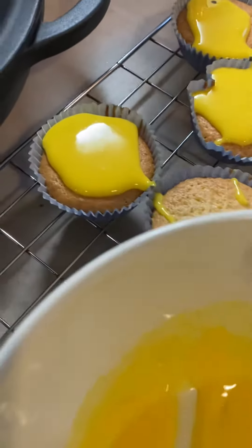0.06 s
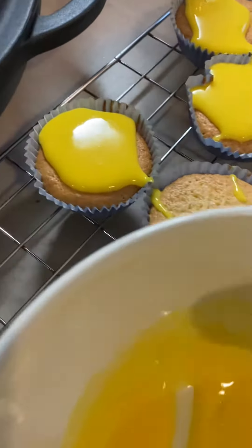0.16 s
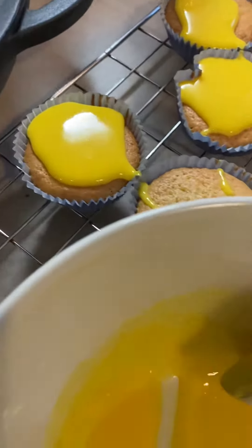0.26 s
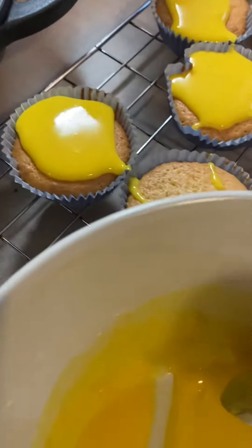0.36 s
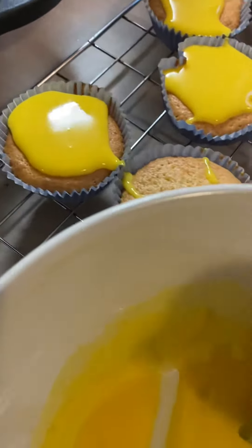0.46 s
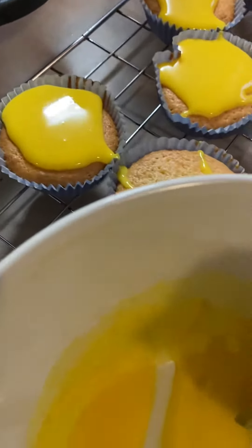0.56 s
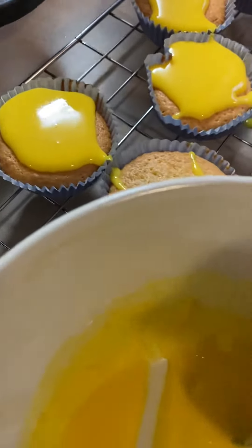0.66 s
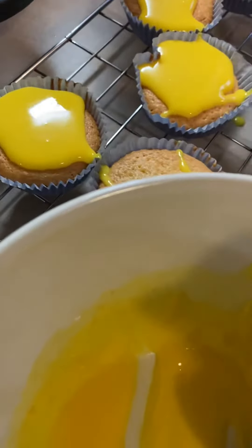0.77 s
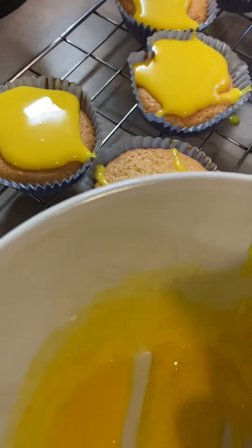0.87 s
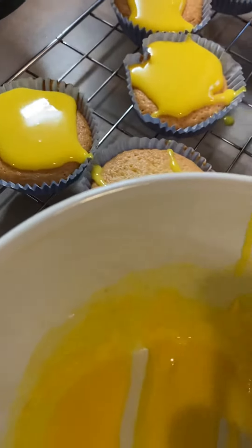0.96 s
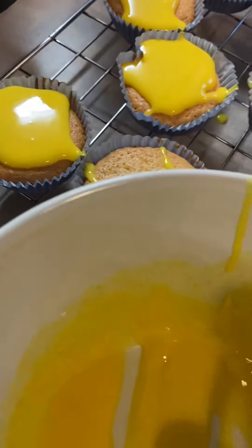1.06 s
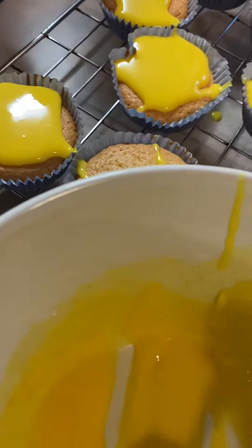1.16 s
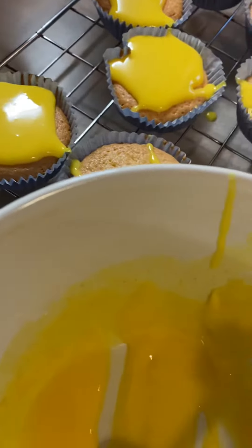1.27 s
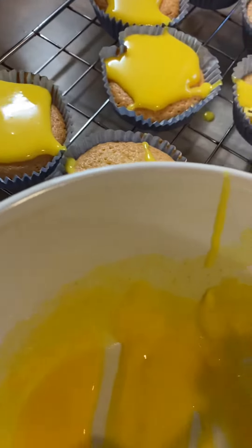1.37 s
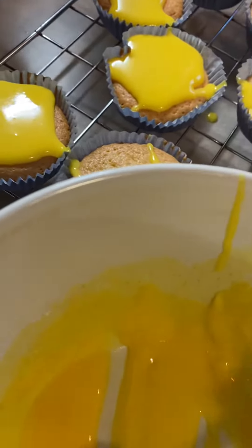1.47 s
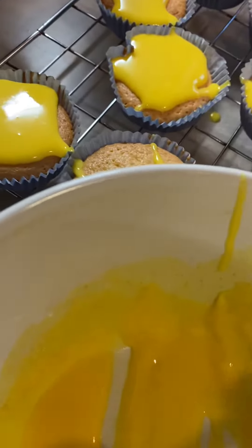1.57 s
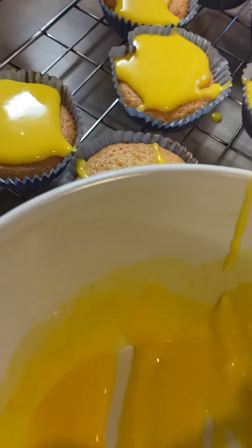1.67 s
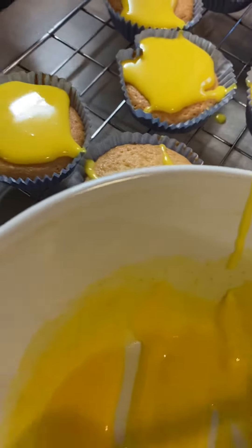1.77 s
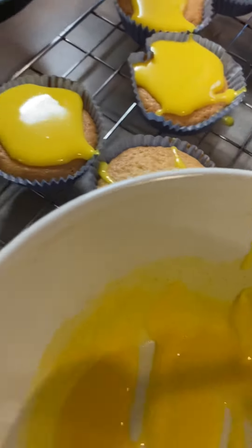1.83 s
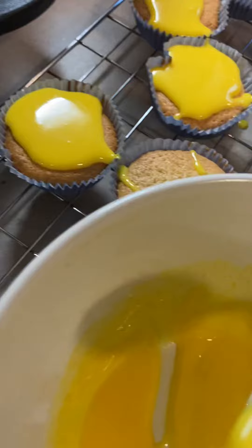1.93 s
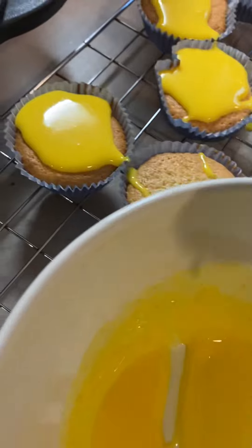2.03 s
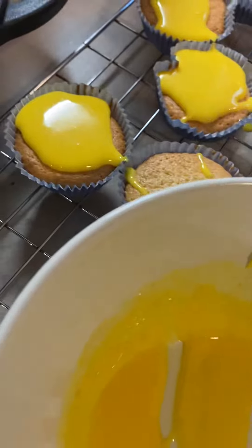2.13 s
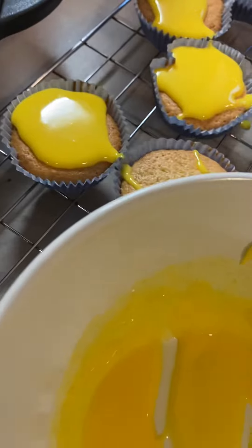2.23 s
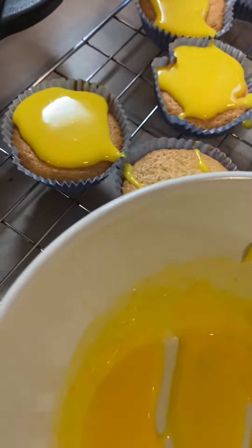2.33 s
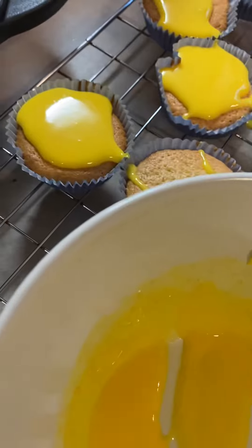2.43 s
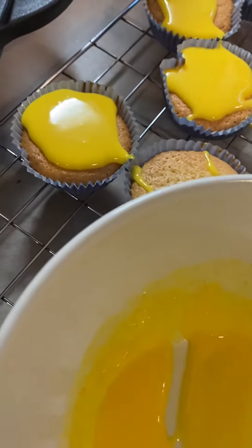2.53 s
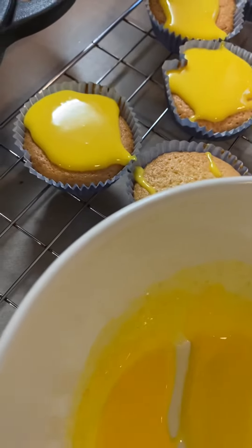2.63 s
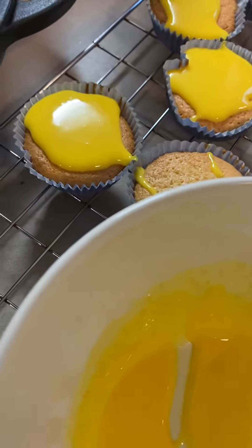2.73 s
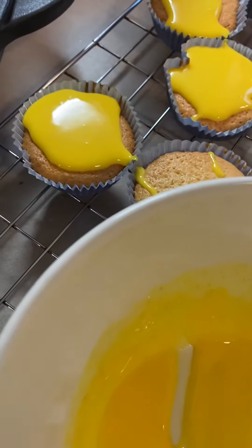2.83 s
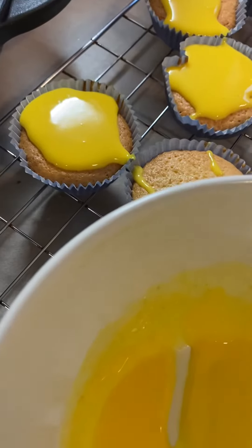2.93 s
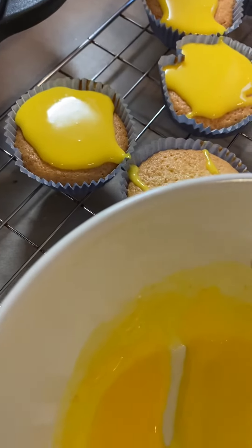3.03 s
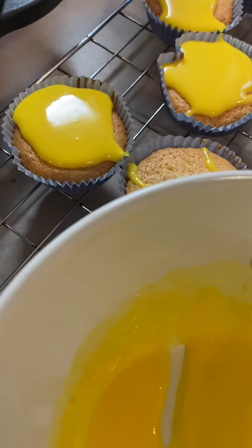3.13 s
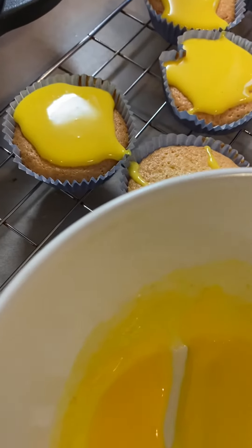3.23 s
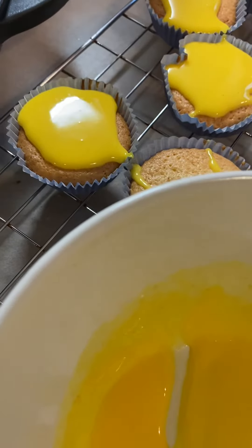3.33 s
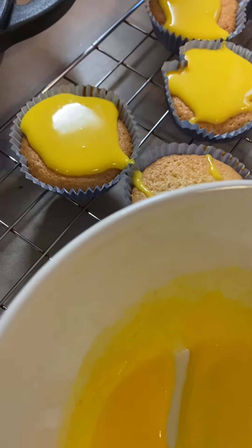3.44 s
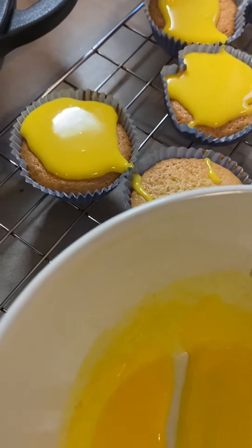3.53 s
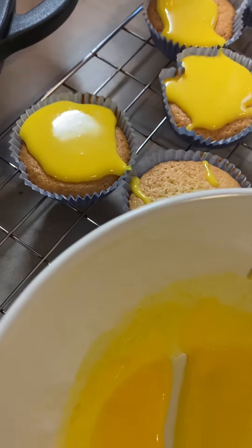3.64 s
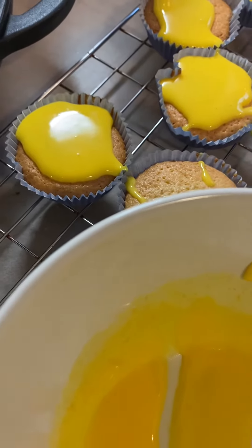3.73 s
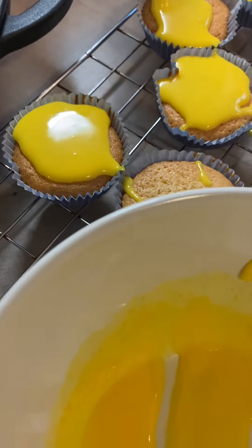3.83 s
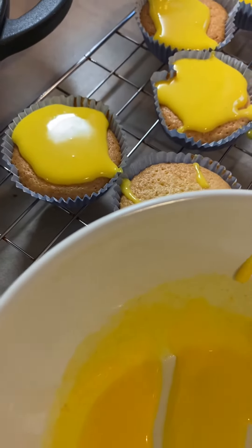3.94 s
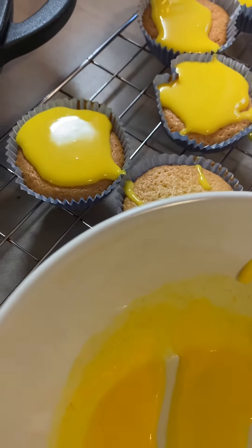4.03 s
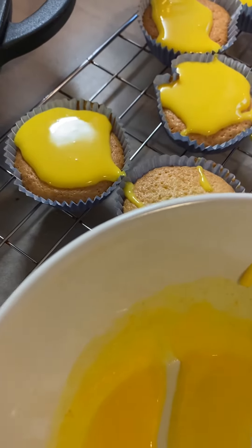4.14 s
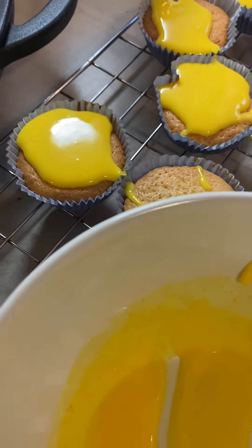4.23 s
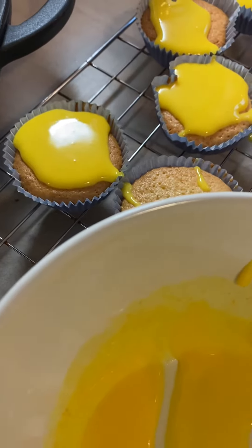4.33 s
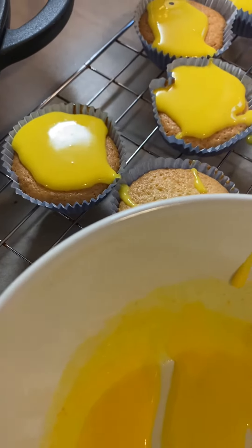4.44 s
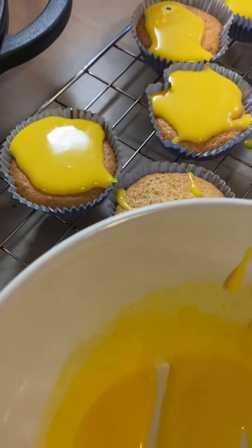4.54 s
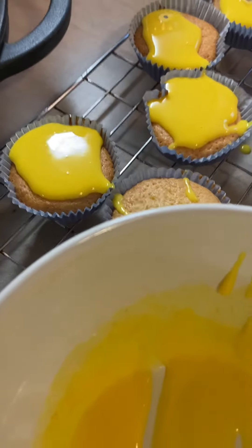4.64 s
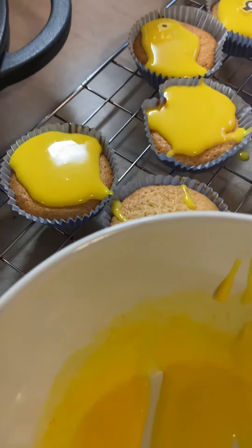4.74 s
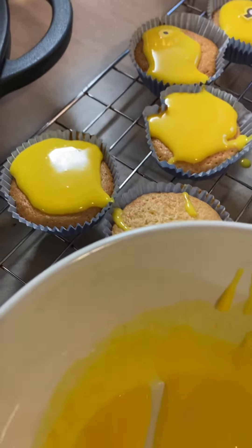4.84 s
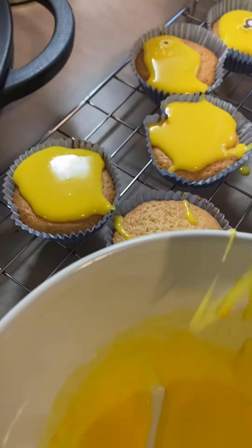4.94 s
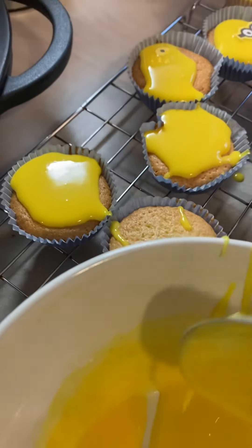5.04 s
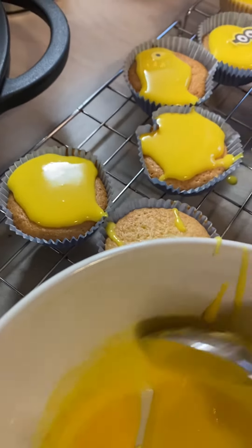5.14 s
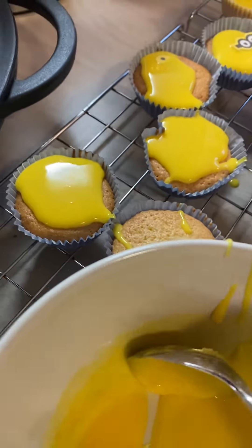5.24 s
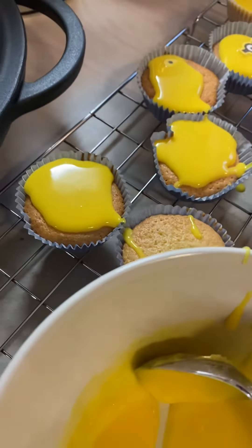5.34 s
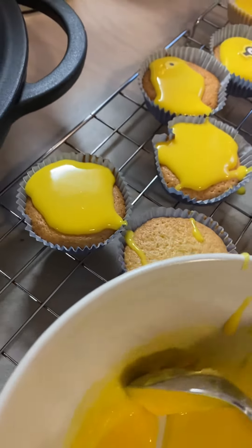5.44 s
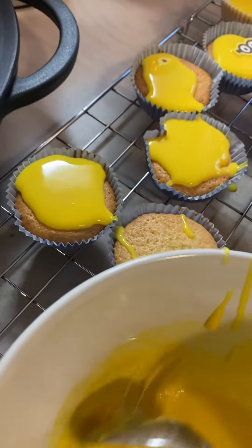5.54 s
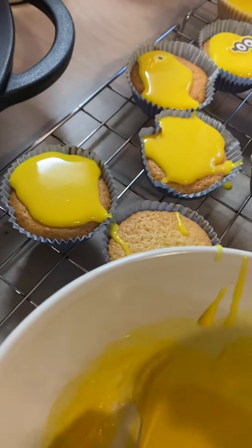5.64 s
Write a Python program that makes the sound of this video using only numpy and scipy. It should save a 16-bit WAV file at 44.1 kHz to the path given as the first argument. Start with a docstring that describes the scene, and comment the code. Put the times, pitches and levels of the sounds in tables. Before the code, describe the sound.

Close stereo pickup of a spoon working in thin icing: gritty, resonant strokes on glazed ceramic, one low thump of the bowl on the worktop, a cluster of bright, quickly choked clinks, and short scrapes. Then mostly quiet, with barely audible spreading rubs and sticky ticks over a wavering low hum. Near the end come two light metallic rings, wet ticks and fresh scraping, in a small, lightly reverberant kitchen.

```python
"""Spoon in a bowl of icing

A metal spoon scrapes through runny icing in a ceramic bowl, knocks and clinks on its wall, and is lifted out.
Soft rubs and, in a pause, faint wet ticks follow; then it comes back, rings lightly and scrapes again.
Scrapes are noisy slips filtered by contact resonances; clinks are sums of dying modes and cracks of noise.
A kitchen appliance hums as wavering sines over coloured noise; a close microphone has two ports."""
import sys
import numpy as np
from scipy import signal
from scipy.fft import rfft, irfft
from scipy.io import wavfile
from scipy.ndimage import uniform_filter1d

SR = 44100
rng = np.random.default_rng(int(sys.argv[2]) if len(sys.argv) > 2 else 0)


def log_audio(samples):
    """Write samples as a 16-bit WAV file to the path given in sys.argv[1]."""
    # one column per channel
    frames = np.atleast_2d(samples).T
    # limit to full scale, then quantise
    limited = np.clip(frames, -1, 1)
    pcm = np.round(limited * 32767).astype(np.int16)
    wavfile.write(sys.argv[1], SR, pcm)


N = 251224
TIME = np.arange(N) / SR  # of each sample [s]
BINS = np.fft.rfftfreq(N, 1 / SR)  # frequency of each bin [Hz]
BLOW_TIME = np.arange(SR // 3) / SR  # time since a short sound began [s]
BLOW_SPAN = 882  # samples (20 ms) over which a short sound's level is judged


def gain_of(db):
    """Logarithmic level: converts decibels to an amplitude ratio."""
    return 10 ** (np.asarray(db) / 20)


def evened(x, span=None):
    """Normalisation: scales to rms 1, judged over the first span samples."""
    return x / np.sqrt(np.mean(x[:span] ** 2) + 1e-20)


def read(points, hz):
    """Interpolation: reads a spectrum on a log-frequency axis."""
    f, value = np.transpose(points)
    return np.interp(np.log(hz + 1), np.log(f + 1), value)


def add(mix, s, sound):
    """Superposition: mixes a sound in at time s."""
    part = mix[max(round(s * SR), 0):][:len(sound)]
    part += sound[:len(part)]


def coloured(x, points):
    """Linear filtering: weights the spectrum of x by a curve in dB."""
    gain = gain_of(read(points, np.fft.rfftfreq(x.shape[-1], 1 / SR)))
    return irfft(rfft(x) * gain, x.shape[-1])


def bands(x, edges):
    """Band-pass filtering: splits a sound between the given edges [Hz]."""
    filters = [signal.butter(3, pair, "band", fs=SR, output="sos") for pair in zip(edges, edges[1:])]
    return [signal.sosfilt(sos, x) for sos in filters]


def ring(modes, t):
    """Modal superposition: a struck body sounds as exponentially dying sines."""
    return sum(gain_of(db) * 1000 ** (-t / t60) * np.sin(2 * np.pi * hz * t) for hz, db, t60 in modes)


def drift(span):
    """Random modulation: twice-smoothed noise of rms 1 that changes over span seconds."""
    size = max(int(span * SR), 2)
    return evened(uniform_filter1d(uniform_filter1d(rng.standard_normal(N), size), size))


# Steady tones of the appliance, the mains hum first: (frequency [Hz], rms level [dB])
HUM_TONES = [(100.0, -53), (123.7, -56), (247.6, -77), (317.6, -72.5)]
# Spectrum of the murmuring kitchen air: (frequency [Hz], relative level [dB per Hz])
AIR_SPECTRUM = [(20, -21), (32, -11), (48, 0.5), (66, 3), (100, 4), (150, 0), (200, -6.5), (330, -5.5),
                (450, -16), (700, -25.5), (1500, -38.5), (4000, -43), (10000, -50), (16000, -61)]
# The mains hum rises once, from this far below its table level to as far above
HUM_RISE_S, HUM_RISE_TAKES_S, HUM_RISE_DB = 2.153, .3, 1.6


def hum(waver_db=1.21, air_db=-59):
    """Superposed tones: mains hum beats against a motor's tone, over the dull murmur of the kitchen air."""
    mains_gain = gain_of(HUM_RISE_DB * np.tanh((TIME - HUM_RISE_S) / HUM_RISE_TAKES_S))
    tones = np.zeros(N)
    for k, (hz, db) in enumerate(HUM_TONES):
        level = gain_of(db + waver_db * drift(0.18))
        tone = level * np.sin(2 * np.pi * hz * TIME + 0.059 * drift(0.28))
        tones += tone * (mains_gain if k == 0 else 1)
    shared = evened(coloured(rng.standard_normal(N), AIR_SPECTRUM))
    # the part that differs between the ports is weakest in the bass
    air_hz, air_level = np.transpose(AIR_SPECTRUM)
    apart_level = air_level + read([(100, -28.5), (400, -6.5), (1500, 2.0)], air_hz)
    apart = evened(coloured(rng.standard_normal((2, N)), np.transpose([air_hz, apart_level])))
    return np.sqrt(2) * tones + gain_of(air_db) * (shared + gain_of(-8.5) * apart)


def slips():
    """Stick-slip: steel slips on glaze, bunched by the hand's judder; colour shifts from spot to spot."""
    sizes = rng.standard_normal(N) * gain_of(2 * np.minimum(rng.exponential(1, N), 4))
    grains = evened(sizes * (rng.random(N) < 4000 / SR))  # about 4000 slips per second
    judder = gain_of(1.2 * drift(.007))
    z = signal.stft((grains + .6 * rng.standard_normal(N)) * judder, nperseg=512)[2]
    patches = uniform_filter1d(rng.standard_normal(z.shape), size=4, axis=0)
    patches = evened(uniform_filter1d(patches, size=8, axis=1))
    return signal.istft(z * gain_of(2.4 * patches), nperseg=512)[1][:N]


RELEASE_S = .015  # a stroke fades for this long, centred on its end


def stroke(start, end, rise, sag):
    """Envelope of a contact force: the spoon bears down, eases off steadily and lets go."""
    attack = np.clip((TIME - start) / max(rise, .002), 0, 1) ** 2
    release = np.clip((end - TIME) / RELEASE_S + .5, 0, 1)
    easing = gain_of(-sag * np.clip(TIME - start - rise, 0, end - start))
    return attack * easing * release


# Strokes of the spoon: (start [s], end [s], rise, at least 2 ms [s], level of the rasp [dB], sag [dB/s],
# hollow body over the rasp [dB], fizz over the rasp [dB], place of contact)
STROKES = [(0, 0.23, 0.0033, -80.5, 5, -1, 9, "wall"), (0.139, 0.327, 0.18, -53.5, -5, -1.5, 3.5, "wall"),
           (0.316, .395, 0.013, -45, 40, -0.5, -1, "wall"), (0.377, 0.545, .02, -54, -9, -11, -15, "wall"),
           (0.511, 0.709, 0.0425, -41, 40, 3.5, -10.5, "deep"),
           (0.499, 1.085, .27, -46, 29.5, 1, 2, "side"), (1.086, 1.169, 0.018, -47.5, 5, 4.5, 2, "side"),
           (1.158, 1.309, 0.026, -52, 6, -5, -2, "side"), (1.298, 1.38, .01, -64, 0.5, -5.5, -1.5, "side"),
           (1.364, 1.506, 0.033, -42, 10.5, -9, -3, "rim"),
           (1.517, 1.616, 0.0365, -43, 34, -7.5, 1.5, "rim"),
           (1.613, 1.849, .01, -67.5, 46, 4.5, -7, "rim"),
           (1.838, 2.0, 0.0084, -50, 152, -10.5, -16, "side"),
           (1.896, 2.529, .14, -73.5, 8, -3.5, -2, "cake"),
           (2.269, 2.549, 0.016, -76, 66.5, 10, -11.5, "cake"),
           (2.974, 3.168, 0.04, -70.5, -3, -7.5, -4.5, "cake"),
           (3.14, 3.417, 0.071, -67.5, 0, -3, -3.5, "cake"),
           (3.4, 3.951, 0.021, -78.5, 22, -3.5, -10.5, "cake"),
           (4.681, 5.33, 0.41, -64.5, 7, -3.5, 0.5, "cake"),
           (5.333, 5.44, 0.022, -60.5, -25, 2, 7.5, "bottom"),
           (5.424, 5.52, 0.022, -43.5, 11, 4.5, 2.5, "bottom"),
           (5.512, 5.694, 0.014, -46.5, 0, -1, -2.5, "bottom")]
# Resonances of spoon and bowl in contact, by place; deep is in the icing, and cake is the soft rub
# of icing being spread on a cake: (frequency [Hz], -3 dB width [Hz], level [dB])
WALL = [(435, 520, -13.5), (845, 72.4, 5), (1271, 340, -7), (1884, 140, -6), (2200, 129.7, 3),
        (3000, 1700, -9.5), (4710, 700, -15.5), (5930, 720, -6.5), (8730, 1025, -35), (9400, 440, -14),
        (9600, 150, -17), (11120, 1000, -18.5)]
DEEP = [(650, 140, -7), (897, 85, 7), (1870, 175, -17), (2270, 84, -11.5), (2650, 110, -33),
        (3370, 270, -18), (4440, 650, -35.5), (5570, 144, -14.5), (6500, 330, -20), (8600, 1100, -21),
        (9900, 230, -14), (12200, 770, -26)]
SIDE_WALL = [(451.8, 300, -13.5), (878, 110, 6), (1770, 280, -20.5), (2400, 350, -13.5), (3229, 680, -13.5),
             (4000, 1000, -19.5), (5134, 600, -15), (6647, 1200, -16.5), (7972, 1500, -20.5),
             (8930, 1100, -17), (9300, 900, -26), (11696, 660, -22.5)]
RIM = [(450, 770, -8), (860, 83, 4), (1210, 400, -5.5), (1920, 140, -4.5), (2295, 130, 3.5),
       (2800, 400, 0.5), (4050, 300, -5), (4800, 600, -9), (5260, 400, -8.5), (6160, 50, 14),
       (8640, 800, -4), (9600, 420, -4), (11600, 900, -13.5)]
CAKE = [(795, 260, -17.5), (2170, 330, -1), (3500, 1070, -5.5), (5280, 470, -2), (6420, 430, -0.5),
        (8700, 660, -16), (9800, 890, -20.5)]
BOTTOM = [(277, 590, -17), (647, 142, -0.5), (970, 460, -5), (1180, 114, 1.5), (1963, 1270, -17),
          (3230, 440, -14), (4540, 390, -9.5), (5630, 1120, -18.5), (7600, 940, -19.5), (10100, 120, -25.5),
          (11400, 1200, -49.5), (12660, 490, -26)]


def scrape(place, resonances, base_db):
    """Source and filter: slips excite the resonances of one place for as long as each stroke lasts."""
    body = gain_of(base_db)  # the response between the resonances
    for k, (hz, width, db) in enumerate(resonances):
        # successive resonances alternate in sign
        body = body + (-1) ** k * gain_of(db) / (1 + 1j * (BINS - hz) / (.8 * width)) ** 2
    rubbed = irfft(rfft(slips()) * body, N)
    low, rasp, fizz = map(evened, bands(rubbed, (200, 1400, 7000, 13000)))
    out = np.zeros(N)
    for start, end, rise, db, sag, body_db, fizz_db, where in STROKES:
        if where == place:
            sound = gain_of(body_db) * low + rasp + gain_of(fizz_db) * fizz
            out += gain_of(db) * stroke(start, end, rise, sag) * sound
    return out


# Spoon on bowl: (time [s], thud [dB], clack [dB], clink [dB], sparkle [dB], skid [s],
# t60 of the choked ring [s])
BLOWS = [(0.1915, -55.5, -58.5, -56.5, -49, 0.0062, 0.066), (1.151, -51.5, -57, -55, -50, 0.0021, 0.065),
         (1.3632, -27, -19.5, -16.5, -16, 0.0035, 0.084), (1.4389, -34, -27.5, -26.5, -31, 0.0033, 0.15),
         (1.5234, -34.5, -30, -35, -38.5, 0.0016, 0.071), (1.602, -71, -51.5, -43.5, -55, 0.016, 0.085),
         (5.0869, -49, -51, -41.5, -33, 0.00039, 0.016), (5.16, -60.5, -62, -67, -49.5, 0.00062, 0.02)]
# Modes of the bowl: (frequency [Hz], level [dB], free t60 [s])
BOWL_MODES = [(855, -5, .08), (1030, -3, .07), (1376, 0, .07), (1720, -10, .05), (1950, -6, .05),
              (2276, 1, .07), (2730, -12, .09), (3330, -8, .06), (3946, 0, .07), (4101, -3, .07),
              (4594, -2, .06), (4727, -7, .07), (5600, -13, .05), (6050, -10, .04), (6257, -14, .12),
              (8527, -8, .05), (8807, -8, .06), (9250, -12, .04), (9637, 5, .07), (10001, -1, .05),
              (11900, -12, .04), (14950, -19, .04)]
# Spectrum of the dense crack of a contact: (frequency [Hz], relative level [dB])
CRACK_SPECTRUM = [(60, -16), (250, -1.5), (850, 5), (1500, -2), (3000, -9.5), (4500, -2.5), (6000, 3.5),
                  (8600, 1), (10000, -10), (11000, -13), (12300, -11), (13200, -26), (16000, -32)]


def bowl_blows(crack_db=-4, crack_t60=0.046, rise=0.00093, free_ring=.04):
    """Impact and damping: the spoon skids on the glaze, then spoon and icing choke the bowl's ring."""
    out, t = np.zeros(N), BLOW_TIME
    for s, *levels, skid, choke_t60 in BLOWS:
        after = np.maximum(t - skid, 0)
        crack = evened(coloured(rng.standard_normal(len(t)), CRACK_SPECTRUM)) * 1000 ** (-after / crack_t60)
        body = ring(BOWL_MODES, t) * (1000 ** (-after / choke_t60) + free_ring)
        blow = evened(body, BLOW_SPAN) + gain_of(crack_db) * evened(crack, BLOW_SPAN)
        blow = blow * (1 - np.exp(-t / rise))
        parts = bands(blow, (120, 1500, 3000, 7000, 16000))  # thud, clack, clink, sparkle
        add(out, s, sum(gain_of(db) * evened(part, BLOW_SPAN) for db, part in zip(levels, parts)))
    return out


# The spoon rings on after a touch: (time [s], level [dB], contact pressure [0-1],
# frequency that the point of contact favours [Hz], factor that divides every t60)
SPOON_RINGS = [(.193, -63, 0.1, 9600, 2), (1.151, -33.5, 0, 4000, 1.32), (1.364, -38, 0.26, 2260, 0.82),
               (1.440, -23.5, 1, 7400, 0.76), (1.524, -31, 0.98, 2306, 1.9), (1.605, -43, 0.17, 5900, 1.4),
               (2.985, -47.5, 0.05, 10410, 1.1), (4.86, -66.5, 0.02, 2885, 0.24),
               (5.088, -29, 0.01, 5300, 0.71), (5.158, -32, 0, 4100, 0.98)]
# Modes of the spoon: (frequency [Hz], level [dB], undivided t60 [s], stiffening at full pressure [Hz])
SPOON_MODES = [(2235, -1, .19, 80), (3995, 0, .17, 105), (6195, -4, .13, 62), (8780, -11, .1, 25),
               (9420, -12, .08, 20), (9625, -9, .08, 15)]
CHOKE_T60_S = .06  # a new touch stops the spoon's earlier ring this fast


def spoon_rings(focus_db=10):
    """Modal excitation: the contact point favours near modes [dB/octave], and pressure stiffens them."""
    out, t = np.zeros(N), BLOW_TIME
    next_touches = [row[0] for row in SPOON_RINGS[1:]] + [N / SR]
    for (s, db, pressure, favoured, damping), stop in zip(SPOON_RINGS, next_touches):
        modes = [(hz + pressure * stiffening, level - focus_db * abs(np.log2(hz / favoured)), t60 / damping)
                 for hz, level, t60, stiffening in SPOON_MODES]
        choke = 1000 ** (-np.maximum(s + t - stop, 0) / CHOKE_T60_S)
        add(out, s, gain_of(db) * ring(modes, t) * (1 - np.exp(-t / 0.00082)) * choke)
    return out


# Small wet ticks and light taps: (time [s], level of the snap [dB], t60 [s],
# pitch of the snap [Hz], its -6 dB width [Hz])
TICKS = [(0.324, -43.5, .19, 5620, 300), (1.099, -53, 0.13, 2700, 3000), (2.279, -56, 0.08, 4496, 3500),
         (2.379, -73, 0.055, 1500, 3000), (2.984, -58.5, 0.055, 6340, 1590),
         (3.094, -61, 0.089, 2657, 3500), (3.216, -63, 0.09, 2470, 3500), (3.342, -65.5, .056, 2525, 3500),
         (3.475, -69, 0.099, 2400, 3500), (4.445, -74, .12, 5500, 3000), (4.69, -58, 0.05, 4000, 720),
         (4.776, -74.5, .026, 6960, 3000), (4.964, -66.5, 0.021, 5110, 2000),
         (5.122, -48, 0.036, 5020, 3000), (5.135, -51, 0.048, 4800, 3000), (5.179, -53, 0.054, 2715, 3500),
         (5.33, -42.5, 0.039, 6080, 910), (5.337, -51, 0.11, 2530, 3000), (5.402, -59, 0.031, 6000, 2500),
         (5.426, -54, .019, 5530, 2500)]
# A tick of this pitch and width has this much dull body and fizz;
# a higher one trades body for fizz, a narrower one loses both
TICK_HZ, TICK_WIDTH_HZ, TICK_BODY_DB, TICK_FIZZ_DB, TICK_DB_PER_OCTAVE = 3000, 6500, 2.5, -3.5, 12
# The faintest ticks fall by chance, within the spread above or below their level
FAINT_PER_S, FAINT_DB, FAINT_SPREAD_DB, FAINT_T60_S = 4, -87, 3, 0.036


def ticks():
    """Damped resonance: one peak each, from a narrow squeak to a broad snap; the higher, the fizzier."""
    out, t = np.zeros(N), BLOW_TIME
    hz = np.fft.rfftfreq(len(t), 1 / SR)
    faint = []
    for when, size, height in rng.random((round(FAINT_PER_S * N / SR), 3)):
        level = FAINT_DB + FAINT_SPREAD_DB * (2 * size - 1)
        pitch = TICK_HZ * 2 ** (2 * height - 1)  # within an octave either way
        faint.append((when * N / SR, level, FAINT_T60_S, pitch, TICK_WIDTH_HZ))
    for s, db, t60, pitch, width in [*TICKS, *faint]:
        burst = rng.standard_normal(len(t)) * 1000 ** (-t / max(t60, .003))
        body, _, fizz = bands(burst, (330, 1400, 8000, 13000))
        snap = irfft(rfft(burst) / (1 + 1j * (hz - pitch) / (0.48 * width)) ** 2, len(t))
        bright = TICK_DB_PER_OCTAVE * np.log2(pitch / TICK_HZ)
        skirts = gain_of(TICK_BODY_DB - bright) * evened(body, BLOW_SPAN)
        skirts = skirts + gain_of(TICK_FIZZ_DB + bright) * evened(fizz, BLOW_SPAN)
        add(out, s, gain_of(db) * (evened(snap, BLOW_SPAN) + width / TICK_WIDTH_HZ * skirts))
    return out


# Modes of the bowl's foot on the worktop: (frequency [Hz], level [dB], t60 [s])
FOOT_MODES = [(448, -16.5, 0.02), (673, -4.5, 0.013), (873, 2, 0.02), (971, -10.5, 0.032), (902, -26, 0.17),
              (1293, -5.5, 0.021), (1728, -5.5, 0.021), (1949, -8, 0.024), (2235, -15.5, 0.024),
              (2690, -15, 0.038), (3734, -13.5, 0.01), (5620, -15.5, 0.01576), (8760, -20, 0.015),
              (9660, -22.5, 0.014)]
KNOCK_S, KNOCK_DB = .4072, -11  # the one knock of the foot


def knock(crunch_db=-24, crunch_t60=0.1, rise=0.00042):
    """Impact: the push of the spoon tips the bowl, and its foot knocks dully on the worktop."""
    out, t = np.zeros(N), BLOW_TIME
    colour = [(60, -8), (300, 0), (1500, 4), (4000, -10.5), (10000, -15), (12000, -15)]  # (Hz, dB)
    crunch = evened(coloured(rng.standard_normal(len(t)), colour)) * 1000 ** (-t / crunch_t60)
    sound = (ring(FOOT_MODES, t) + gain_of(crunch_db) * crunch) * (1 - np.exp(-t / rise))
    add(out, KNOCK_S, gain_of(KNOCK_DB) * sound)
    return out


# The hollow that opens in the icing behind the spoon: its volume grows steadily, so its pitch sinks
HOLLOW_S, HOLLOW_HZ, HOLLOW_DB = .532, 820, -41
HOLLOW_RISE_S, HOLLOW_DOUBLES_S, HOLLOW_FADE_DB_PER_S = 0.021, 0.082, 71


def hollow(width_hz=170):
    """Cavity resonance: slips sound the growing hollow, whose pitch sinks with the root of its volume."""
    age = np.maximum(TIME - HOLLOW_S, 0)
    hz = HOLLOW_HZ / np.sqrt(1 + age / HOLLOW_DOUBLES_S)
    # shift the moving pitch to zero, filter there, and shift back
    turn = np.exp(2j * np.pi * np.cumsum(hz) / SR)
    r = np.exp(-np.pi * width_hz / SR)
    sound = (turn * signal.lfilter([1], [1, -2 * r, r * r], slips() / turn)).real
    level = gain_of(HOLLOW_DB - HOLLOW_FADE_DB_PER_S * age)
    return evened(sound) * np.minimum(age / HOLLOW_RISE_S, 1) * level


# Level difference of the two ports: (frequency [Hz], left minus right [dB])
PORT_TILT = [(100, 0.5), (400, -2), (850, -6), (1400, 0.5), (1950, 1.5), (2270, -5.5), (2730, 2.5),
             (3330, -0.5), (4600, -1), (6000, 0.5), (13000, -0.3)]
# Phase by which the left port leads, for rubs and for clinks: (frequency [Hz], lead [rad])
LEAD_SCRAPE = [(100, 0), (400, 0.87), (850, 0.7), (1900, 0.15), (2600, 1.47), (3400, 0.96), (4600, 1.07),
               (5600, 0), (6300, 2.5), (8700, 4.5), (9700, 7), (11900, 8)]
LEAD_CLINK = [(100, 0), (850, -.5), (1900, 0), (2270, -1.3), (2730, .8), (4100, .75), (4600, .4),
              (5600, .9), (6200, 2.1), (8700, 4.5), (9700, 5.45), (10100, 5.6), (11900, 7.6)]


def ports(x, lead):
    """Interchannel difference: the two microphone ports hear the bowl with different level and phase."""
    half = gain_of(read(PORT_TILT, BINS) / 2) * np.exp(.5j * read(lead, BINS))
    return irfft(rfft(x) * np.array([half, 1 / half]), N)


# Decay of the room: (frequency [Hz], t60 [s])
ROOM_DECAY = [(100, 0.83), (1000, .45), (4000, 0.38), (10000, 0.14), (16000, 0.27)]


def kitchen(x):
    """Reverberation: sparse reflections after 4 ms, each band dying at its own speed."""
    size = SR // 2
    taps = rng.standard_normal((2, size)) * (rng.random((2, size)) < .08) * (np.arange(size) > .004 * SR)
    hz, t, z = signal.stft(taps, SR, nperseg=256)
    tail = signal.istft(z * 1000 ** (-t / read(ROOM_DECAY, hz)[:, None]), SR, nperseg=256)[1]
    return signal.fftconvolve(x[None], tail / np.linalg.norm(tail[0]), axes=1)[:, :N]


def scene():
    """Superposition: strokes, clinks and ticks close by; room and hum behind."""
    rubs = (scrape("wall", WALL, base_db=-20.5)
            + scrape("deep", DEEP, base_db=-31)
            + scrape("side", SIDE_WALL, base_db=-34.5)
            + scrape("rim", RIM, base_db=-24.5)
            + scrape("cake", CAKE, base_db=-23.0)
            + scrape("bottom", BOTTOM, base_db=-35.0))
    rubs = rubs + hollow() + knock() + ticks()
    hits = bowl_blows() + spoon_rings()
    close = ports(rubs, LEAD_SCRAPE) + ports(hits, LEAD_CLINK)
    return close + gain_of(-19) * kitchen(rubs + hits) + hum()


# Overall colour of the sound, a dip near 7.4 kHz and a dull top above 12.5 kHz:
# (frequency [Hz], level [dB])
OVERALL_COLOUR = [(20, 3.5), (6300, -6.5), (6800, -8), (7400, -25), (8000, -15.5), (8500, -3), (12200, -6),
                  (13100, -16), (14300, -14), (15000, -3.5), (16000, -8.5)]
EDGE_HZ = 15900  # upper band limit


def record(dry):
    """Frequency response: the overall colour with its dip near 7.4 kHz, then the band limit."""
    low_pass = signal.firwin(511, EDGE_HZ, window=("kaiser", 9), fs=SR)
    return signal.oaconvolve(coloured(dry, OVERALL_COLOUR), low_pass[None], "same")


dry = scene()
out = record(dry)
log_audio(out)
```